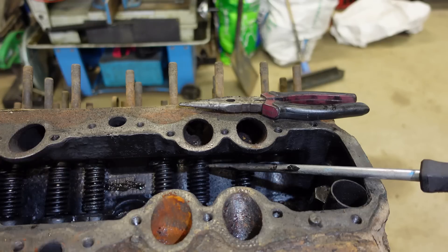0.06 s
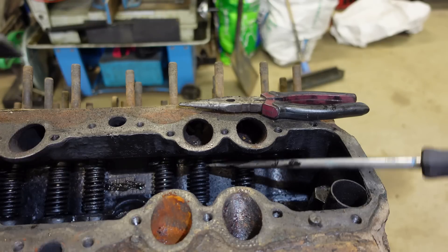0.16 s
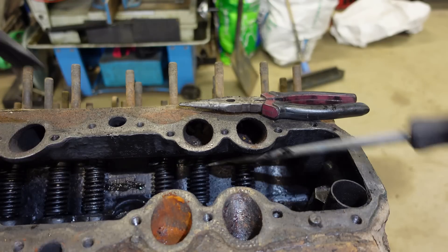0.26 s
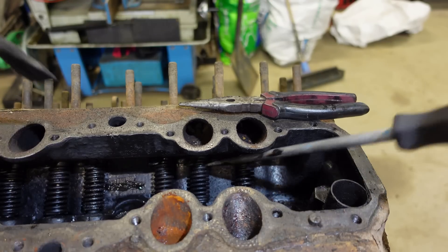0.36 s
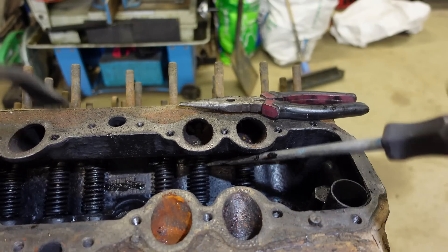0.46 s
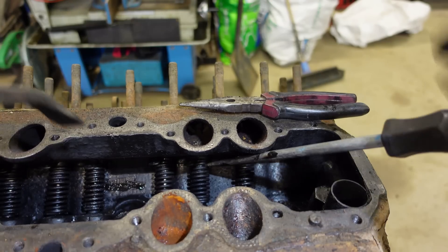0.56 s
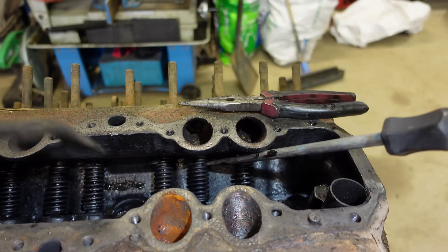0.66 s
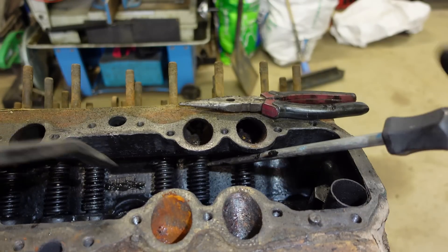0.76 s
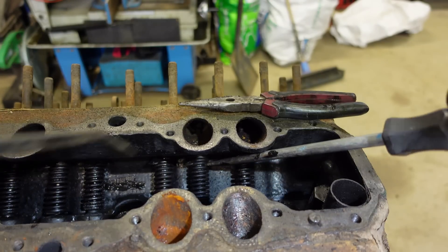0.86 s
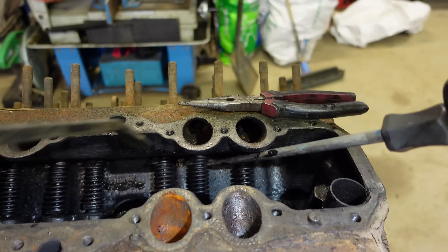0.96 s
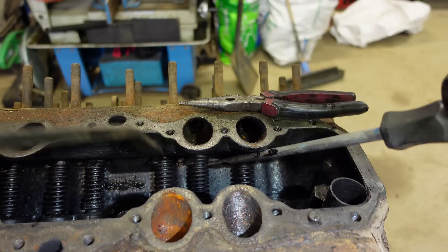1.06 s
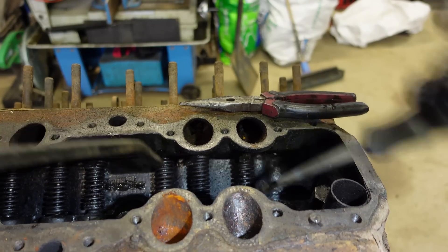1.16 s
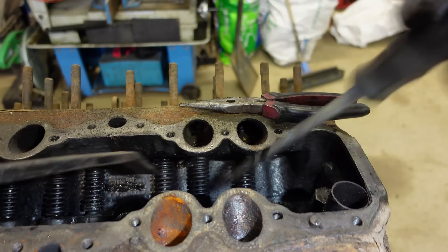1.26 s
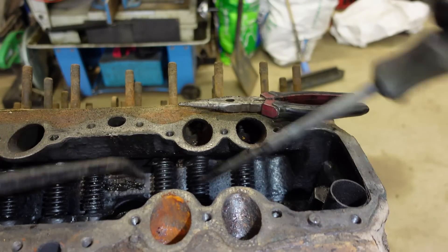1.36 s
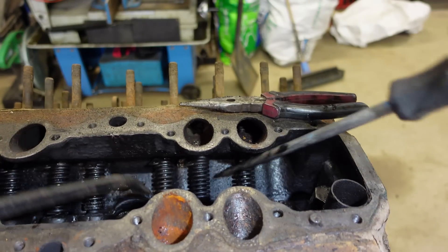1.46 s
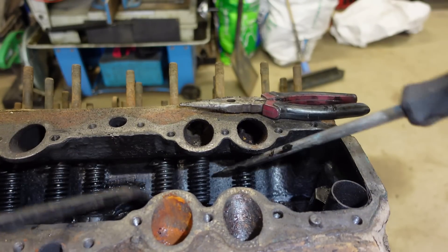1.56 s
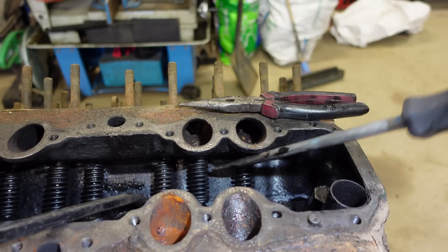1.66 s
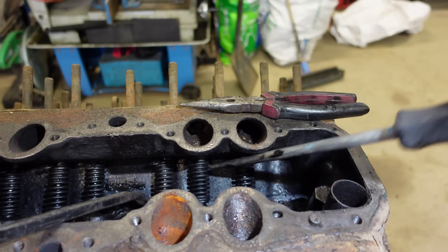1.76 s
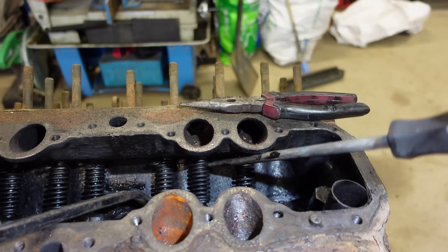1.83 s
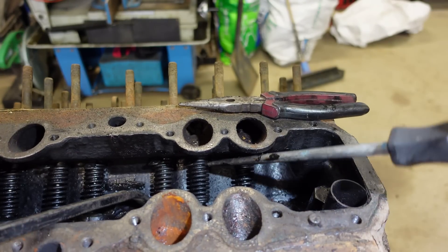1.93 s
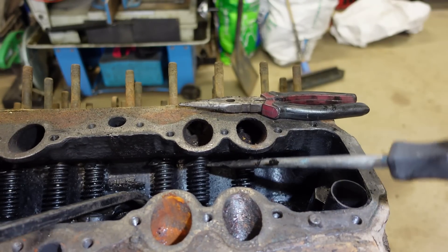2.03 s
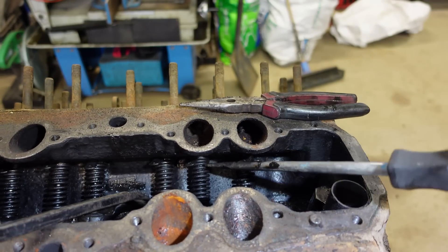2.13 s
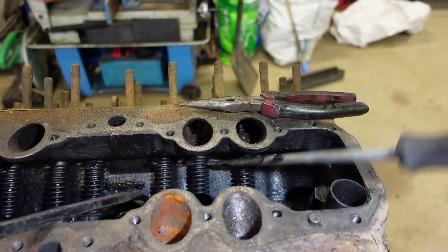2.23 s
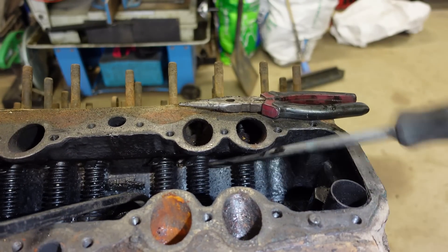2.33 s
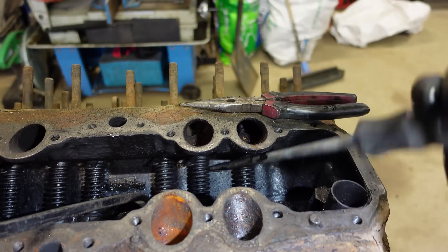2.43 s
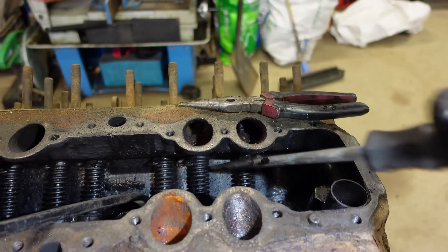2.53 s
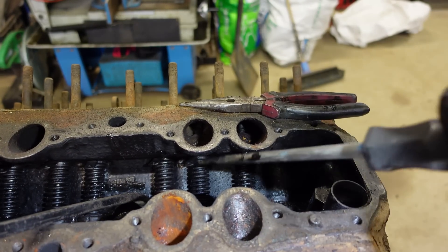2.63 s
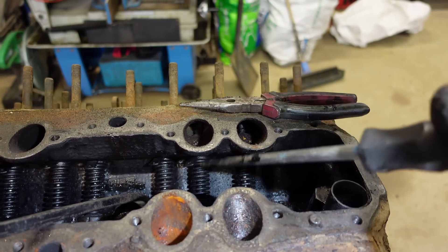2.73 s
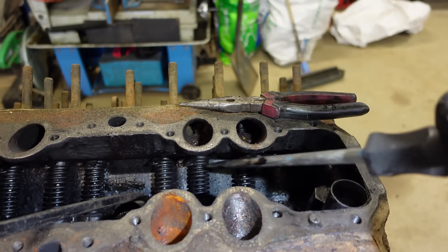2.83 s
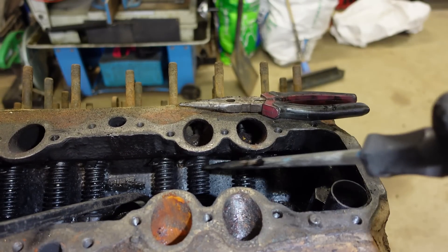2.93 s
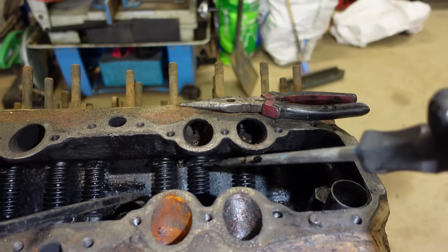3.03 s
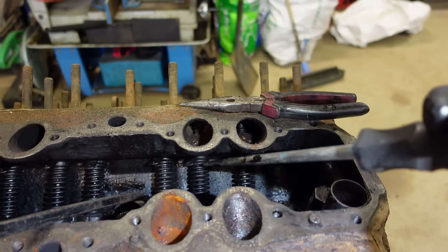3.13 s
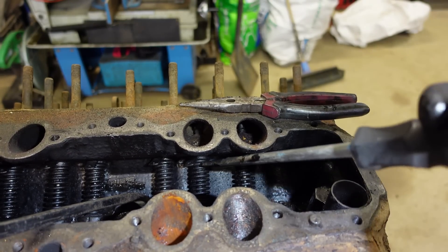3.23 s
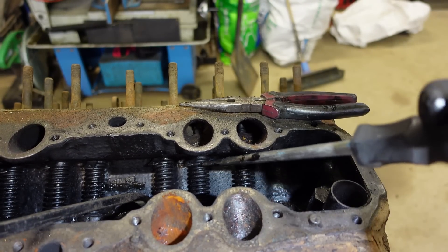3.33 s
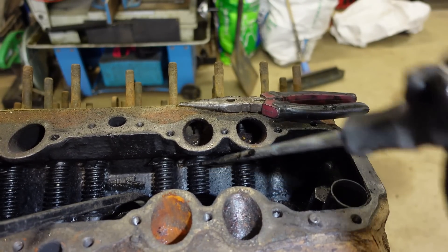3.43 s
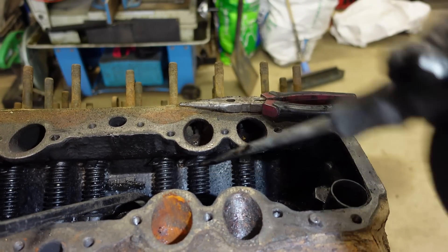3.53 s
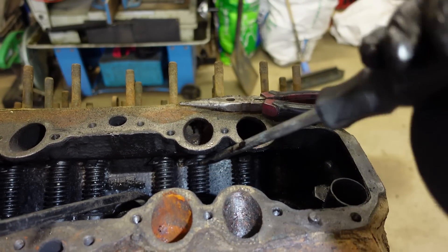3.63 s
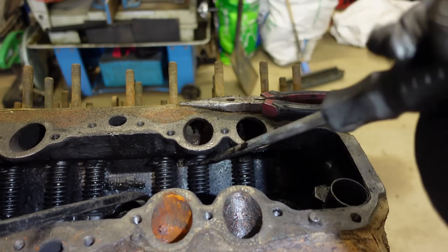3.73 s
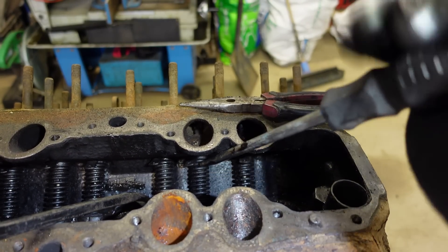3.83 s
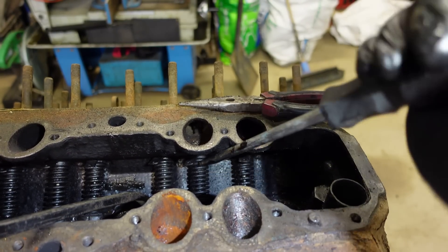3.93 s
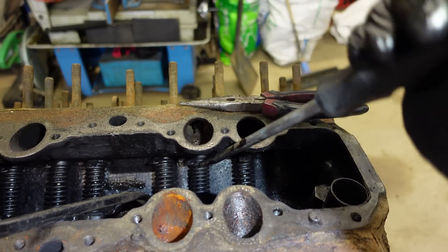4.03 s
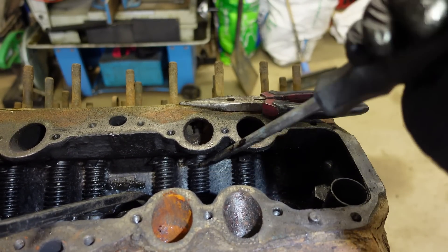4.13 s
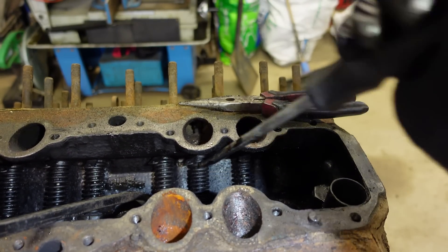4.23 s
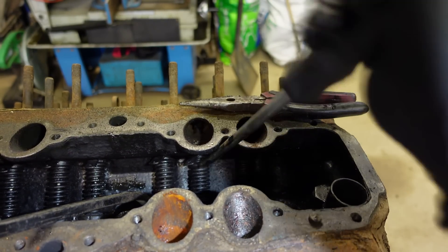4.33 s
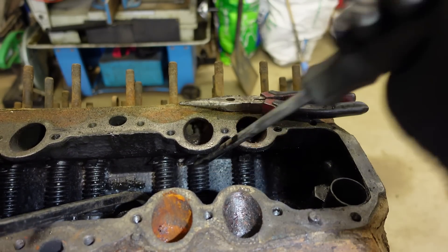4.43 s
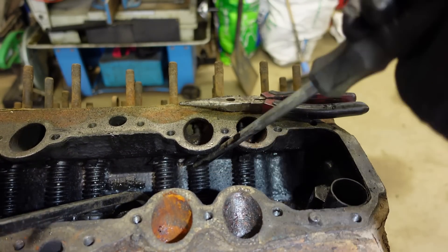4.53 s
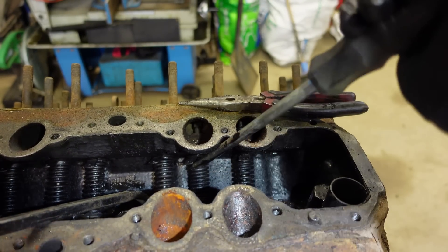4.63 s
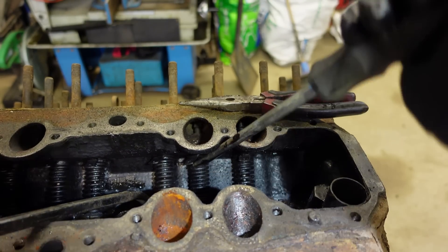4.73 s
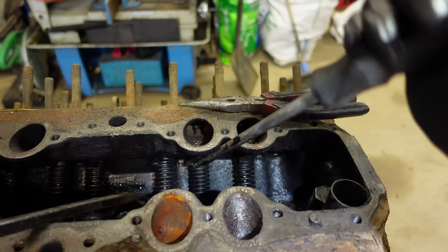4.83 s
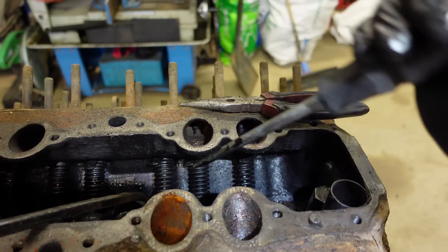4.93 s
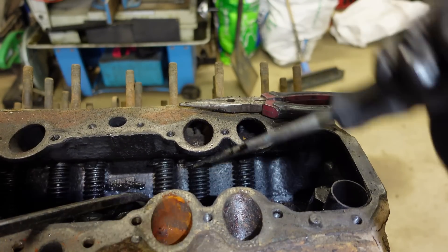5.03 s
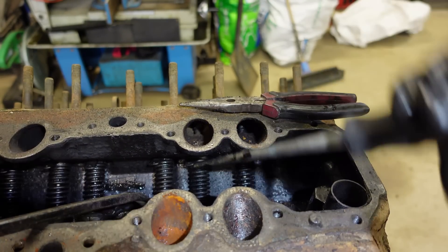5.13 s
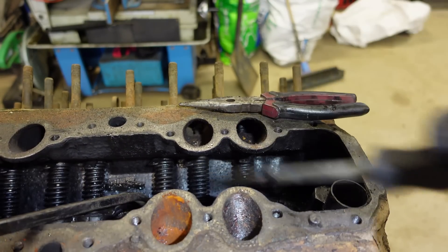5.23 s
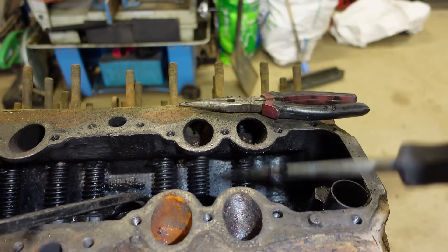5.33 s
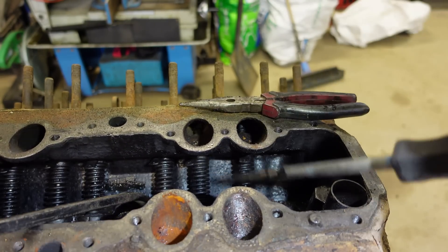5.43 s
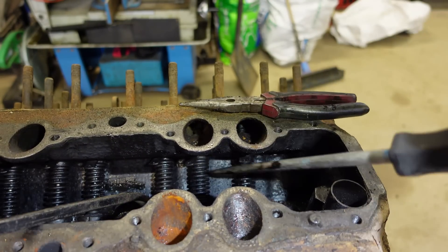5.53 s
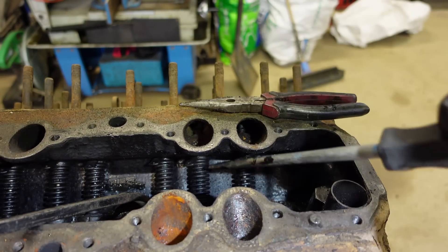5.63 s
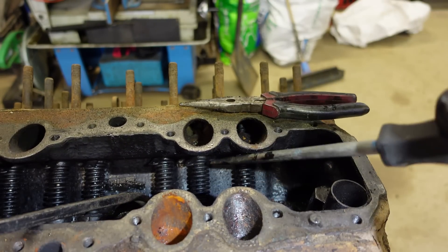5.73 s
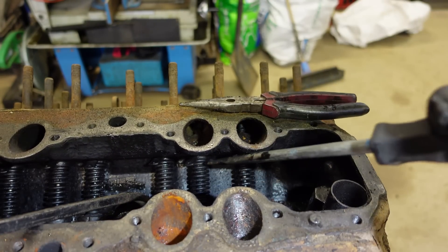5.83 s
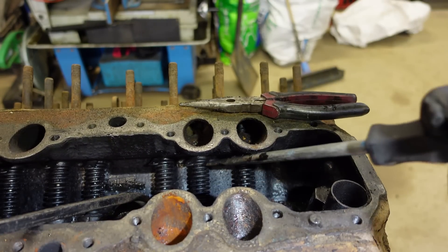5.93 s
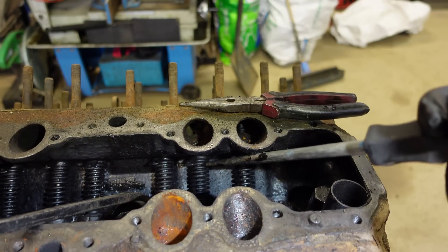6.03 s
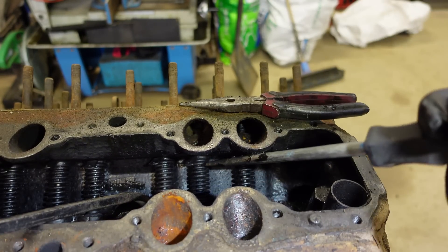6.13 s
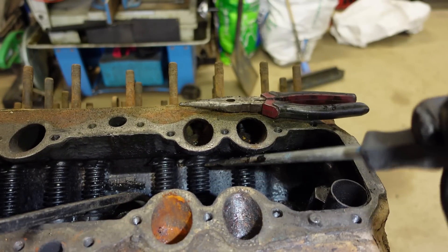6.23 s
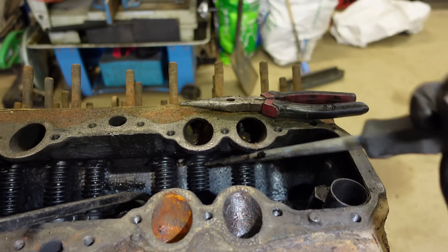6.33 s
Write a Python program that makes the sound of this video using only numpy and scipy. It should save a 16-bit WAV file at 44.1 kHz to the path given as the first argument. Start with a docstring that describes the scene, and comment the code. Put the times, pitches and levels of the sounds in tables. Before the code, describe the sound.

Close-up prying among valve springs in an iron engine block. Light grating and dull ticks lead to a violent burst of sharp metallic cracks, squashed at their loudest, with beating spring tones fading within about half a second. More clacks and knocks thin out, leaving soft air and a barely audible low hum. Later come faint rubbing, a fuzzy coil chatter, a sharp small click group, and a few tiny ticks in the live garage.

```python
"""In a garage, two steel tools pry among the valve springs of a cast-iron engine block.
A screwdriver tip grates over oily iron (shaped noise), slips and strikes (short shaped clicks).
The springs ring on (clusters of fading tones), a coil chatters faintly and the room echoes.
Soft air and a faint, swelling hum lie under it all; a fast limiter squashes the hardest blows."""
import sys
import numpy as np
from scipy import signal
from scipy.fft import rfft, irfft
from scipy.io import wavfile
from scipy.ndimage import uniform_filter1d, minimum_filter1d

SR = 44100
rng = np.random.default_rng(int(sys.argv[2]) if len(sys.argv) > 2 else 0)


def dump(signal):
    """Clip the signal to [-1, 1] and save it as 16-bit WAV at the path in sys.argv[1]."""
    limited = np.clip(np.atleast_2d(signal).T, -1, 1)
    pcm = np.round(limited * 32767).astype(np.int16)
    wavfile.write(sys.argv[1], SR, pcm)


N = 281402
T = np.arange(N) / SR  # time of each sample, in seconds

# what a tap on the block radiates: (frequency [Hz], relative level [dB])
IRON_SOUND = [(100, -47.5), (200, -36), (340, -14), (600, -10.5), (1050, 0.5), (1600, 0), (2600, 3),
              (4200, -2), (5600, 0.5), (8000, -6.5), (11000, -13), (16000, -24.5)]


def amp(db):
    """Turns decibels into a plain multiplier."""
    return 10 ** (np.asarray(db) / 20)


def unit(x):
    """Scales a signal to an average strength (rms) of 1."""
    return x / np.sqrt(np.mean(x ** 2) + 1e-20)


def read(points, hz):
    """Reads between the points of a table, with frequency on a log scale."""
    f, value = np.transpose(points)
    return np.interp(np.log(hz + 1), np.log(f + 1), value)


def add(mix, s, sound):
    """Mixes a sound in at time s, cutting off what runs past the end."""
    part = mix[..., max(round(s * SR), 0):][..., :sound.shape[-1]]
    part += sound[..., :part.shape[-1]]


def colour(x, points):
    """Reshapes a signal's balance of low and high by a table, at rms 1."""
    gain = amp(read(points, np.fft.rfftfreq(N, 1 / SR)))
    return unit(irfft(rfft(x) * gain, N))


def drift(hz):
    """Makes a slow random wander, with little motion faster than hz."""
    slow = 1 / (1 + (np.fft.rfftfreq(N, 1 / SR) / hz) ** 4)
    return unit(irfft(rfft(rng.standard_normal(N)) * slow, N))


def stereo(mid, side, side_db):
    """Builds left and right from a shared part and a part that is opposite in the two."""
    opposed = amp(side_db) * side
    return np.array([mid + opposed, mid - opposed])


def causal(db):
    """Makes the quickest impulse that has this spectrum (minimum phase)."""
    log_gain = np.log(amp(np.r_[db, db[-2:0:-1]]))
    return np.fft.ifft(np.exp(np.conj(signal.hilbert(log_gain)))).real


def tone(hz):
    """A low sine whose loudness and phase waver slightly, at about rms 1."""
    loudness = amp(1.5 * drift(hz=4))
    phase = 2 * np.pi * hz * T + .35 * drift(hz=3)
    return np.sqrt(2) * loudness * np.sin(phase)


def background(air_db=-59, side_db=-14, drone_hz=172.5, drone_db=-85):
    """Soft room air is shaped noise; two low tones swell and sink under a steady higher one."""
    # balance of the room air: (frequency [Hz], relative level [dB])
    air_balance = [(18, -76), (30, -36), (106, -20), (404, -16), (449, -14.5), (760, -6), (913, -5.5),
                   (1320, -2), (1430, -2), (2120, -10), (2480, -14.5), (5900, -25.5), (7670, -25),
                   (14000, -28.5), (16000, -32)]
    # tones of the hum: (frequency [Hz], relative level [dB])
    hum_tones = [(102.5, -0.5), (124, -9)]
    # how the hum swells and sinks: (time [s], level [dB])
    hum_swell = [(0.0, -89), (1.81, -91), (2.57, -74.5), (3.77, -77.5), (3.86, -92), (4.32, -74.5),
                 (4.92, -85.5), (5.44, -82), (5.54, -89.5), (6.38, -75)]
    mid, side = (colour(rng.standard_normal(N), air_balance) for _ in range(2))
    air = amp(air_db) * stereo(mid, side, side_db)
    swell = amp(np.interp(T, *np.transpose(hum_swell)))
    hum = swell * sum(amp(db) * tone(hz) for hz, db in hum_tones)
    return air + hum + amp(drone_db) * tone(drone_hz)


def grains(per_s, spread_db):
    """Tiny slips at random moments; a positive spread makes a few large, a negative one a few small."""
    size = amp(spread_db * np.minimum(rng.exponential(1, N), 4))
    happens = rng.random(N) < per_s / SR
    return size * rng.standard_normal(N) * happens


def scrape(judder_db=1.5, catch_db=-12, peak_share=0.28):
    """The tip drags over rough iron: crowds of tiny slips and some ticks swell and ease with each stroke."""
    # one row a stroke, levels at its peak before judder and mixing:
    # (start [s], length [s], grating [dB], fine grit [dB])
    strokes = [(-.08, 0.19, -38.5, -52), (0.063, .29, -41, -53.5), (0.334, .06, -43.5, -55),
               (0.382, 0.31, -51.5, -62.5), (0.539, 0.08, -41.5, -45.5), (0.613, 0.36, -53, -60.5),
               (0.808, 0.34, -56, -52), (1.138, 0.094, -18, -25), (1.922, 0.18, -36.5, -45.5),
               (2.01, .2, -40.5, -48), (2.2, .16, -38, -49.5), (2.33, 0.34, -46, -67),
               (3.38, 0.16, -59.5, -66.5), (3.529, 0.034, -41.5, -55.5), (3.595, 0.62, -50.5, -57),
               (3.928, 0.62, -50, -58), (4.32, 0.097, -51, -51.5), (4.392, 0.58, -55.5, -68.5),
               (4.81, 0.34, -59, -64.5), (5.212, 0.032, -46, -52.5)]
    # balance of the grating: (frequency [Hz], relative level [dB])
    grate_balance = [(150, -67), (250, -28), (645, -13), (1210, -8), (1530, -3.5), (1860, -2.5),
                     (2460, -2.5), (2830, -3.5), (5840, -11), (7000, -32.5), (9100, -47.5), (15400, -120)]
    # balance of the fine grit: (frequency [Hz], relative level [dB])
    grit_balance = [(2650, -41), (4500, -13), (5840, -1), (9070, -9), (9920, -11), (13900, -16),
                    (16000, -20)]
    coarse, fine = np.zeros(N), np.zeros(N)
    for start, length, grate_db, grit_db in strokes:
        # pressure peaks early, peak_share of the way through the stroke
        pressure = np.interp((T - start) / length, [0, peak_share, 1], [0, 1, 0])
        coarse += pressure * amp(grate_db)
        fine += pressure * amp(grit_db)
    grating = coarse * colour(grains(per_s=3500, spread_db=2.5), grate_balance)
    grit = fine * colour(grains(per_s=1500, spread_db=2.0), grit_balance)
    # the tip catches with small ticks that sound like taps on the block
    catches = amp(catch_db) * fine * colour(grains(per_s=30.4, spread_db=-1.5), IRON_SOUND)
    judder = amp(judder_db * drift(hz=50))
    return (grating + grit + catches) * judder


def garage(x, build_s=0.0027, clutter_s=.06, side_db=-10.5):
    """Separate echoes off the clutter merge into a dense tail; each pitch range fades at its own rate."""
    # time the room takes to fade by 60 dB: (frequency [Hz], fade time [s])
    fade_times = [(200, 1), (800, 0.36), (1600, 0.7), (3300, 0.51), (5500, 0.52), (9000, 0.47),
                  (15000, 0.32)]
    density = np.minimum(.035 + (np.arange(SR) / SR / clutter_s) ** 2 / 16, 1)
    present = rng.random((2, SR)) < density
    echoes = rng.choice([-1, 1], (2, SR)) * present / np.sqrt(density)
    hz, t, z = signal.stft(echoes, SR, nperseg=256)
    fade = amp(-60 * t / read(fade_times, hz)[:, None])
    tail = signal.istft(z * fade, SR, nperseg=256)[1]
    tail *= 1 - np.exp(-np.arange(tail.shape[1]) / SR / build_s)  # the echoes build up quickly
    room = stereo(*tail / np.linalg.norm(tail[0]), side_db)
    return signal.fftconvolve(x[None], room, axes=1)[:, :N]


def blows(spot_db=10, overtone_db=9, overtone_ratio=1.6, spot_octaves=0.16,
          room_spot_share=0.44, steel_spot_share=1.36,
          bass_hz=1300, treble_hz=4800, bass_db_per_octave=9, middle_spot_hz=1950, least_bass_db=0.5,
          rattle_db=-2, rattle_t60=0.014, side_db=-9):
    """Each slip of the tip strikes the iron: gives the direct clicks and what drives room and springs."""
    # one row a blow, peak is that of the bare click:
    # (time [s], peak [dB], pitch of the struck spot [Hz], treble lift [dB], send to the room [dB])
    strikes = [(.182, -31, 1350, -14, -4), (.357, -27.5, 1580, -11, 1.5), (.529, -30, 1770, -15, 6),
               (.584, -17, 3050, 14, -11), (0.614, -22.5, 3400, 20, -10), (.845, -31.5, 4150, 5.5, -3),
               (1.1441, -8, 4300, 6, -6), (1.154, 2, 2770, 10, -16), (1.1698, 8, 4500, 4.5, 2.5),
               (1.2903, -1.5, 2700, 13, -15.5), (1.3078, 4, 2840, -6.5, -1.5),
               (1.5167, -9, 1740, -12, -4.5), (1.5698, -15, 1660, -24, -5.5),
               (1.6411, -2, 2120, -16.5, -3.5), (1.6739, -10.5, 2160, -17, -5.5),
               (1.8216, -16.5, 2160, -10, -1), (2.0365, -22, 1640, -5, -7), (2.192, -31.5, 1940, -1, 4),
               (2.3311, -7.5, 2850, -6, 1), (2.349, -16.5, 2670, -3, -25), (2.402, -6, 1230, -10, -3.5),
               (3.428, -38, 2250, -35, 4.5), (3.445, -37.5, 2500, -19, -1), (3.556, -28, 566, -7, -5),
               (3.727, -32.5, 2400, 8, -2), (3.764, -17.5, 2560, -10.5, -13), (3.7917, -37, 3600, -5, -25),
               (3.804, -33.5, 2450, 4, -14), (3.928, -29.5, 5200, 16, -14), (4.011, -34, 4100, 10, -5),
               (4.316, -28, 1950, -18, -17), (4.3243, -15, 1310, -18.5, -3.5),
               (4.437, -27.5, 1160, -24, 10), (4.451, -7.5, 2900, -9.5, -5.5),
               (4.471, -12.5, 1340, -22, -11.5), (4.4817, -20, 880, -7, 1.5), (5.228, -30.5, 2990, -7, -6),
               (5.299, -34, 3270, 1, -10), (5.402, -46, 1750, -4, -3), (5.996, -45, 4700, 23, -17)]
    # damped resonances of the casting: (frequency [Hz], width [Hz], lift [dB])
    casting = [(683, 20, 3.5), (1079, 84, 5.5), (1542, 52, 7.5), (2178, 33, 3), (3240, 130, 2.5),
               (4080, 300, 7), (7000, 367, 2)]
    # echoes between the walls of the valve chest: (delay [ms], gain [multiplier])
    chest = [(.82, 0.22), (1.75, -0.19), (2.6, 0.16)]
    # how hard a blow drives the steel; a firm grip lowers it: (time [s], level [dB])
    freedom = [(1.0, -23), (1.15, -9), (1.31, -7), (1.5, -15.5), (1.65, -6), (1.85, -34), (2.1, -29)]
    hz, t = np.fft.rfftfreq(2048, 1 / SR), np.arange(2048) / SR
    direct, to_room, to_steel = np.zeros((2, N)), np.zeros(N), np.zeros(N)
    resonances = sum(lift / (1 + (2 * (hz - f) / width) ** 2) for f, width, lift in casting)
    iron = read(IRON_SOUND, hz) + resonances
    walls = 1 + sum(gain * np.exp(-2j * np.pi * hz * ms / 1000) for ms, gain in chest)
    # bending waves carry the treble ahead of the bass, spreading the click over a millisecond or so
    bending = np.exp(-1j * np.sqrt(hz / 6))
    fade = amp(-60 * t / rattle_t60) * (1 - np.exp(-t / 0.0006))
    for s, db, spot_hz, treble_db, room_db in strikes:
        # a low spot is a heavy one and moves the whole casting; a hard, short contact adds treble
        bass_db = max(bass_db_per_octave * np.log2(middle_spot_hz / spot_hz), least_bass_db)
        bass = bass_db / (1 + (hz / bass_hz) ** 4)
        treble = treble_db * (1 - 1 / (1 + (hz / treble_hz) ** 6))
        shape = iron + bass + treble
        # the spot resonates at its pitch and once more above it
        peaks = ((spot_hz, spot_db), (overtone_ratio * spot_hz, overtone_db))
        spot = sum(lift / (1 + (np.log2((hz + 1) / f) / spot_octaves) ** 2) for f, lift in peaks)
        # the spot stands out close up; the room hears more of the whole block, the springs more of the spot
        click, room_click, kick = (irfft(rfft(causal(shape + share * spot)) * bending)
                                   for share in (1, room_spot_share, steel_spot_share))
        size = amp(db) / abs(click).max()
        # the crowded coils scatter the click for a few milliseconds
        scatter = rng.standard_normal((2, len(t))) * fade / np.linalg.norm(fade)
        rattle = signal.fftconvolve(stereo(*scatter, side_db), click[None], axes=1)
        add(direct, s, size * irfft(rfft(click) * walls))
        add(direct, s, size * amp(rattle_db) * rattle)
        add(to_room, s, size * amp(room_db) * room_click)
        add(to_steel, s, size * amp(np.interp(s, *np.transpose(freedom))) * kick)
    return direct, to_room, to_steel


def springs(drive, ring_db=-2.5, side_db=-11, spread_hz=18, spread_share=.009):
    """The steel rings on: the coils are nearly alike, so each tone is a rough, beating cluster."""
    # tones of the springs and steel shafts: (frequency [Hz], relative level [dB], 60 dB fade time [s])
    modes = [(235, 4, 0.38), (345, 0, .6), (1104, -1.5, 0.92), (1240, 2, 0.72), (1548, -6, 0.46),
             (1720, 0, 0.3), (2156, -5, 0.46), (2439, -9, 0.49), (2890, -5.5, 1), (2848, -4, 0.68),
             (3185, 3, 0.37), (3000, -4, .6), (3190, -2.5, 0.46), (3216, -8, 0.71), (3375, -1, .6),
             (3400, -7.5, .4), (3830, -13.5, 0.69), (4120, -5.5, .6), (4788, -19.5, .4), (6760, 7.5, 0.51),
             (6740, 2, .6), (7440, -5.5, .5), (6900, 6.5, 0.57), (7550, -0.5, 0.48)]
    t = np.arange(int(.7 * SR)) / SR
    hz = np.fft.rfftfreq(len(t), 1 / SR)
    ring = np.zeros((2, len(t)))
    for centre, db, t60 in modes:
        width = spread_hz + spread_share * centre  # wider in the treble
        random_phase = 2j * np.pi * rng.random((2, len(hz)))
        cluster = np.exp(random_phase - .5 * ((hz - centre) / width) ** 2)
        mode = irfft(cluster, len(t)) * amp(-60 * t / t60)
        ring += amp(db) * mode / np.linalg.norm(mode, axis=1, keepdims=True)
    ring = stereo(*ring / np.linalg.norm(ring[0]), side_db)
    return amp(ring_db) * signal.fftconvolve(drive[None], ring, axes=1)[:, :N]


def chatter():
    """Stick and slip on a coil gives a faint, fuzzy note: a tone that wanders at random."""
    # the tip chatters on a coil: (start [s], end [s], frequency [Hz], width [Hz], level [dB])
    notes = [(0.657, 0.987, 1624, 84, -55.5), (3.785, 4.143, 1191, 103, -54.5),
             (3.994, 4.262, 2133, 200, -54.5)]
    out = np.zeros(N)
    for start, end, hz, width, db in notes:
        progress = np.clip((T - start) / (end - start), 0, 1)
        swell = np.sqrt(np.sin(np.pi * progress).clip(0))
        turn = 2 * np.pi * hz * T
        fuzzy = drift(width / 2) * np.cos(turn) + drift(width / 2) * np.sin(turn)
        out += amp(db) * swell * fuzzy
    return out


def scene(rub_direct_db=-2, rub_room_db=-6, blow_room_db=1):
    """Adds up scraping, blows, ringing steel and chatter, with the room around them."""
    rub = scrape()
    direct, to_room, to_steel = blows()
    room = garage(amp(blow_room_db) * to_room + amp(rub_room_db) * rub)
    return background() + amp(rub_direct_db) * rub + room + direct + springs(to_steel) + chatter()


def record(dry, ceiling_db=-4, recover_db_per_s=250, edge_hz=16200):
    """A fast limiter holds the peaks, so the tail swells as it lets go; then the top treble is cut."""
    over_db = np.maximum(20 * np.log10(abs(dry).max(0) + 1e-9) - ceiling_db, 0)
    fall = T * recover_db_per_s
    held_db = np.maximum.accumulate(over_db + fall) - fall
    # widen each hold by about a millisecond either way, then smooth it
    widened_db = -minimum_filter1d(-held_db, size=110)
    held_db = uniform_filter1d(widened_db, size=110)
    lowpass = signal.firwin(301, edge_hz, window=("kaiser", 9), fs=SR)
    return signal.oaconvolve(dry * amp(-held_db), lowpass[None], "same", axes=1)


dry = scene()
out = record(dry)
dump(out)
```